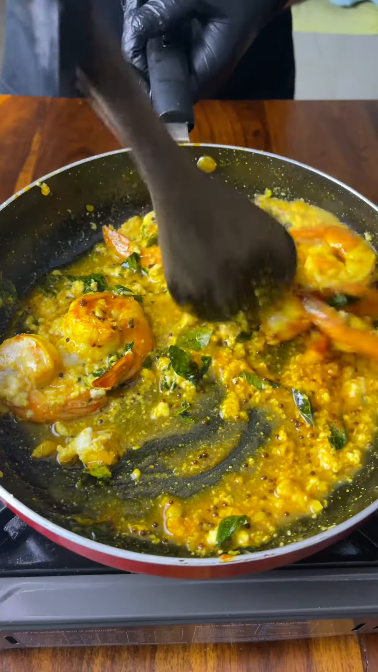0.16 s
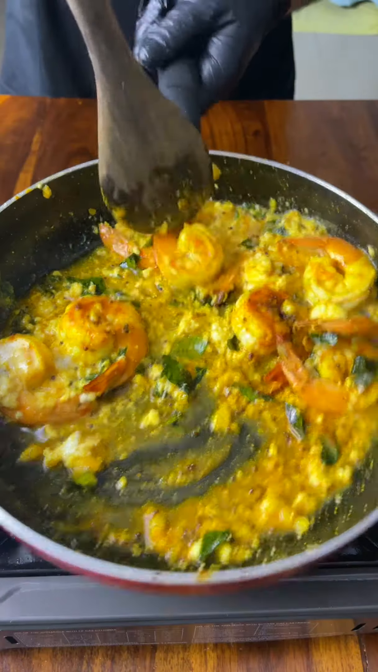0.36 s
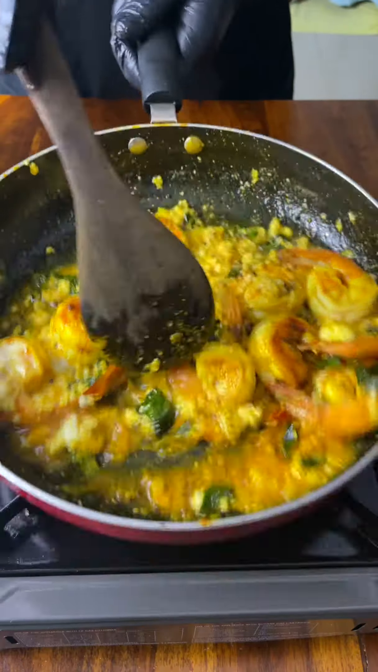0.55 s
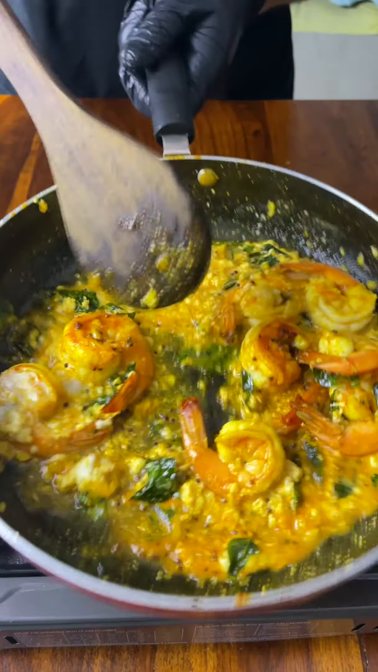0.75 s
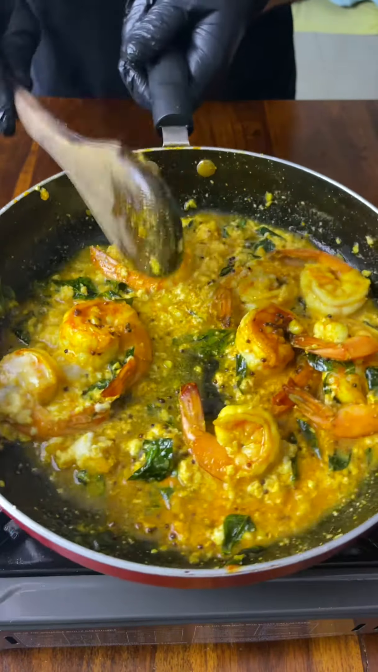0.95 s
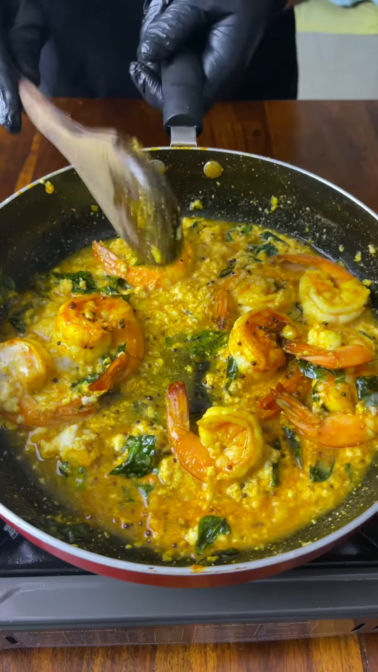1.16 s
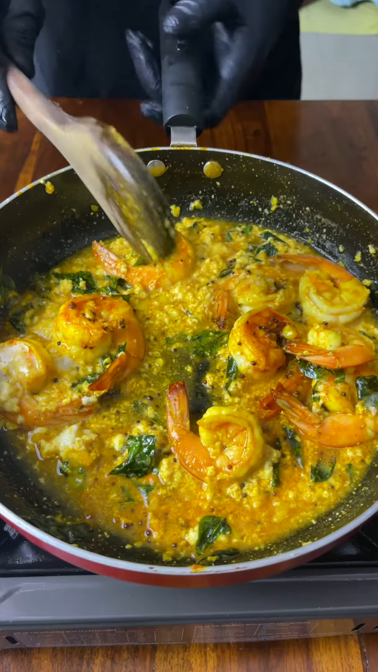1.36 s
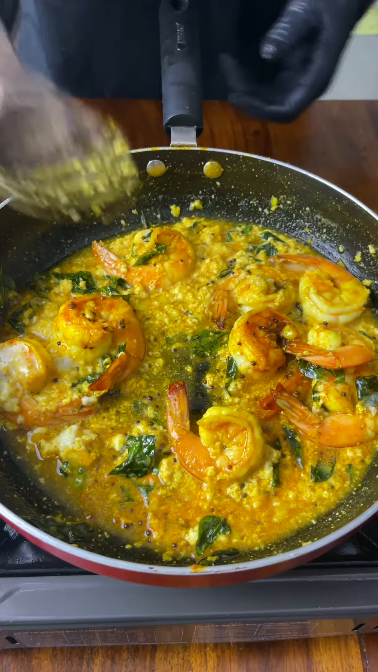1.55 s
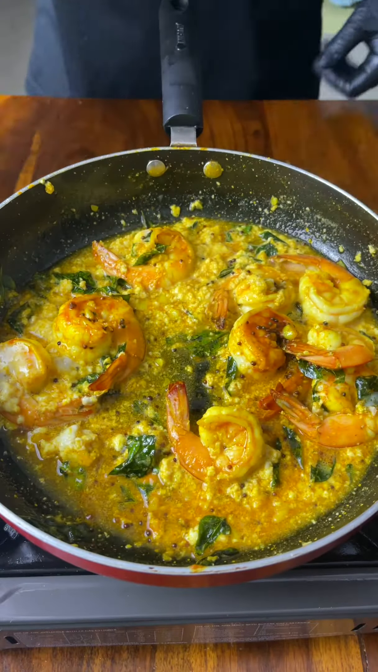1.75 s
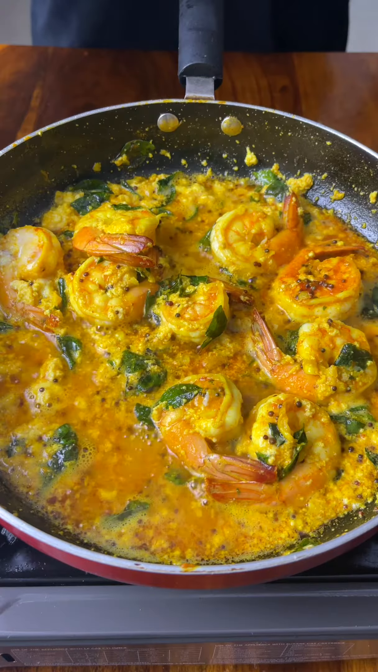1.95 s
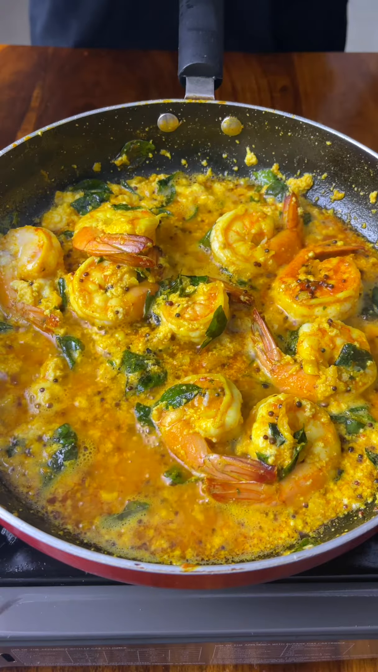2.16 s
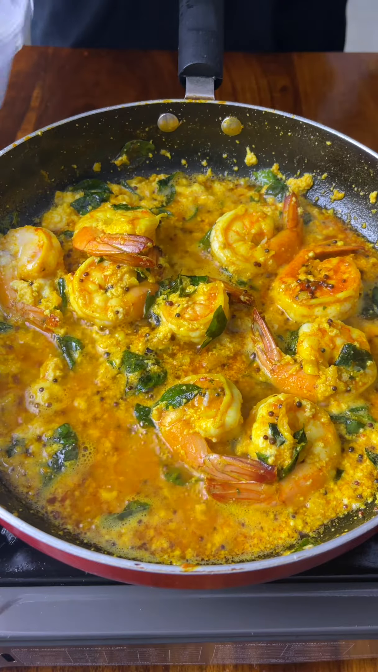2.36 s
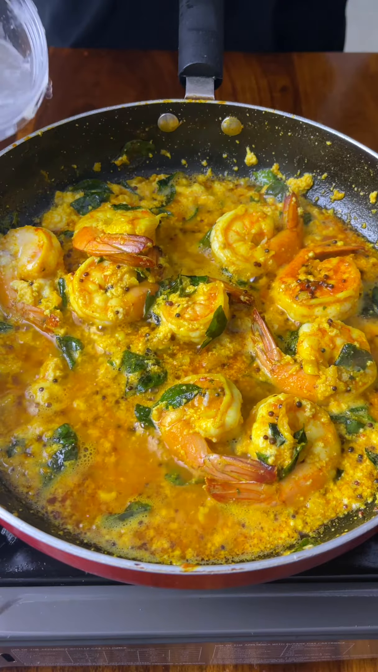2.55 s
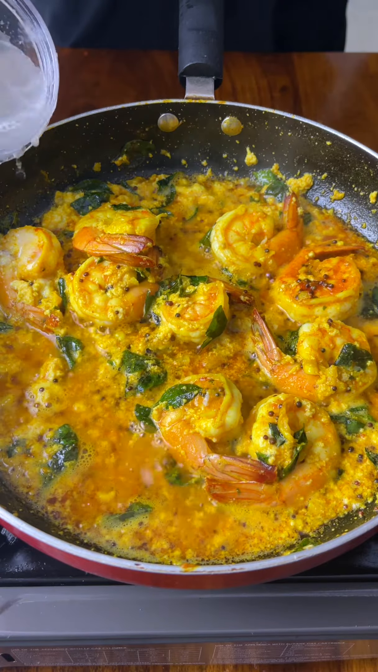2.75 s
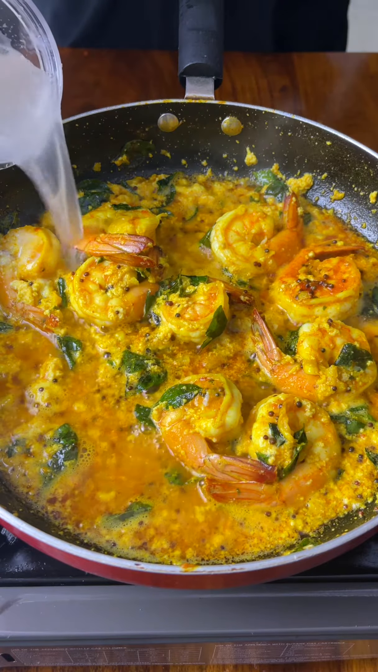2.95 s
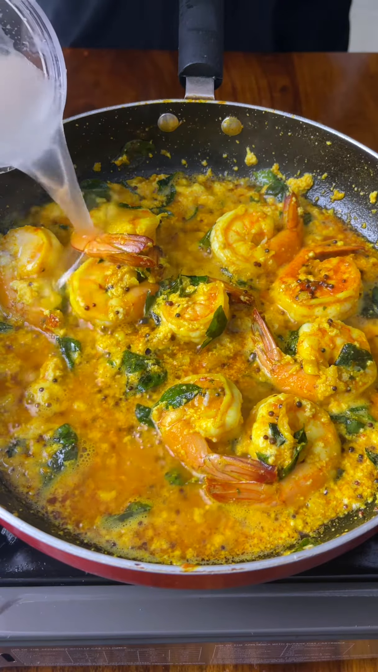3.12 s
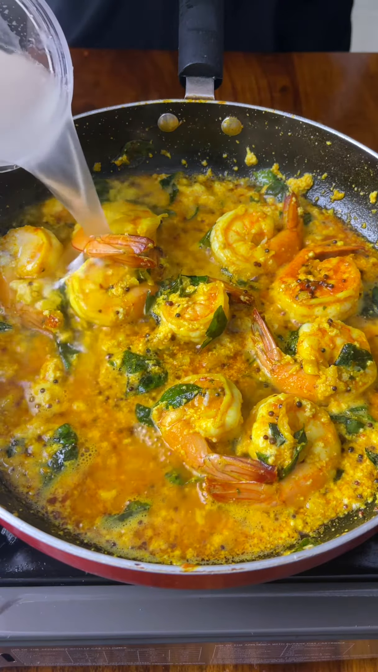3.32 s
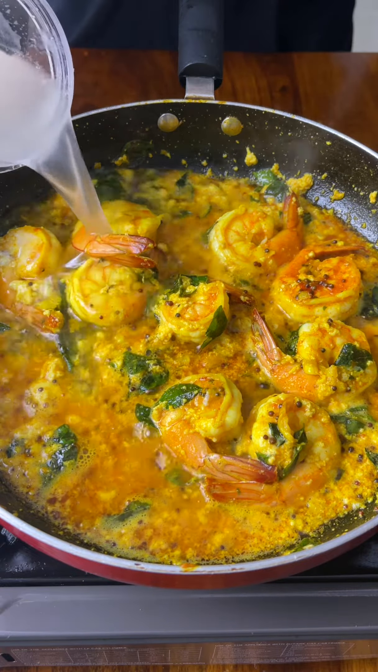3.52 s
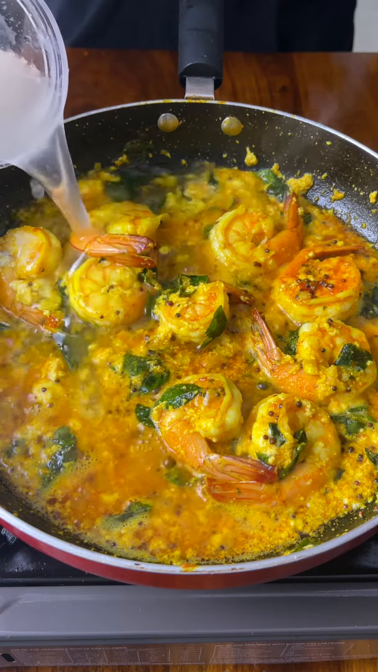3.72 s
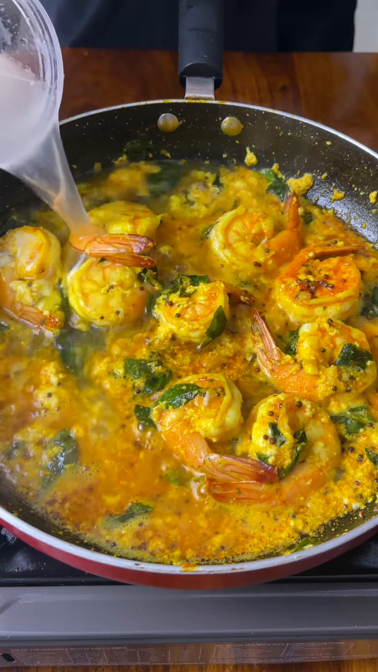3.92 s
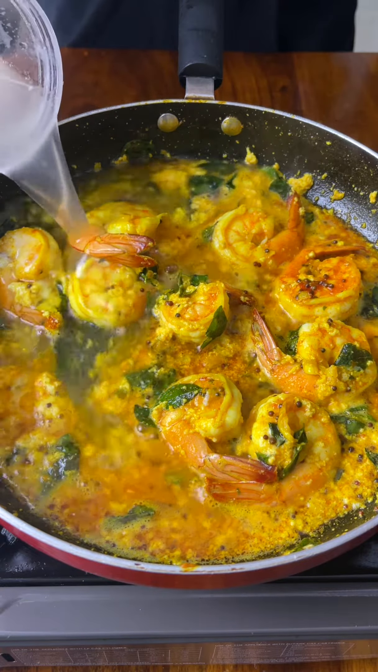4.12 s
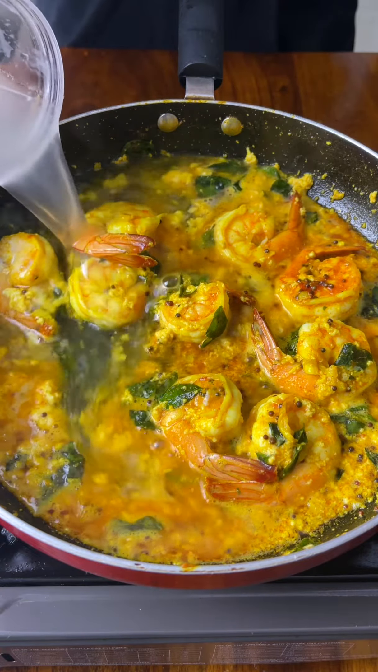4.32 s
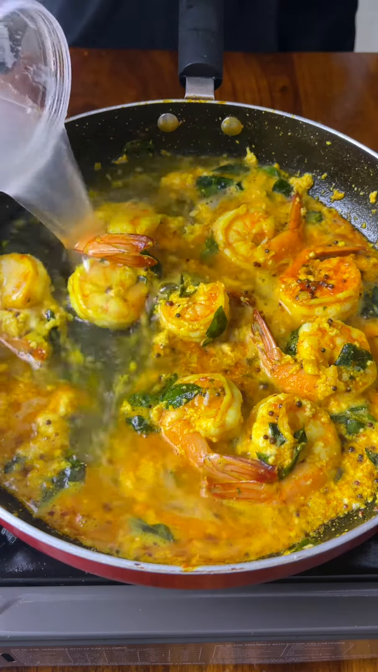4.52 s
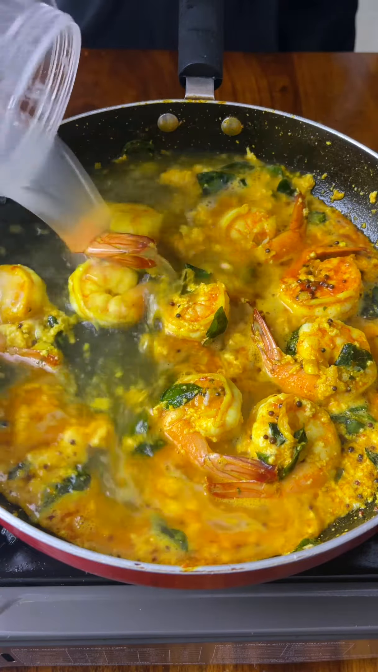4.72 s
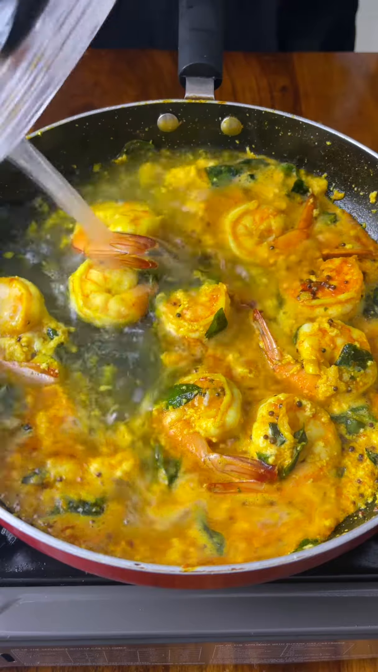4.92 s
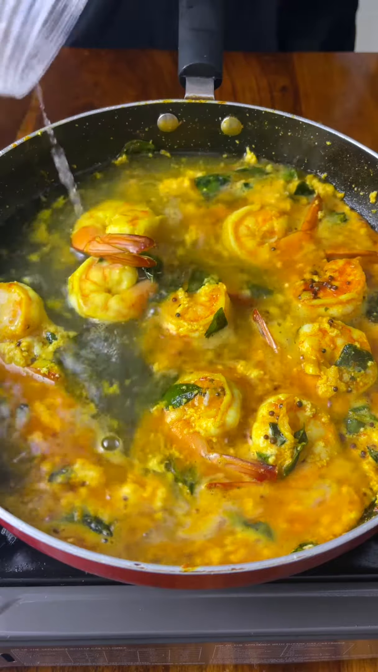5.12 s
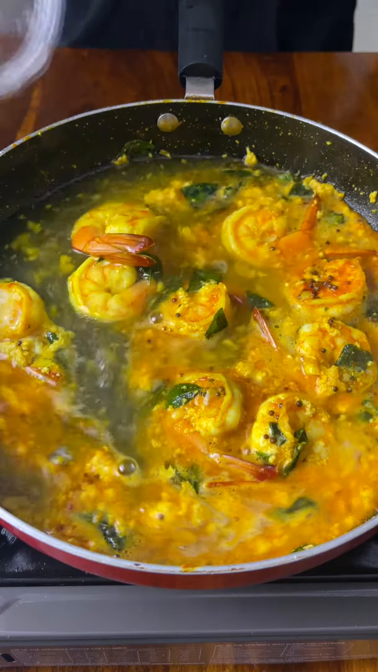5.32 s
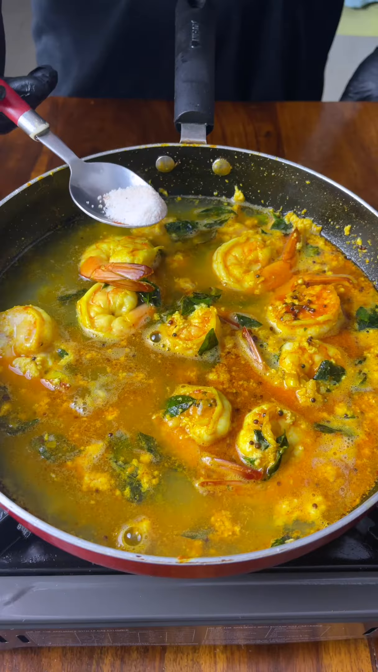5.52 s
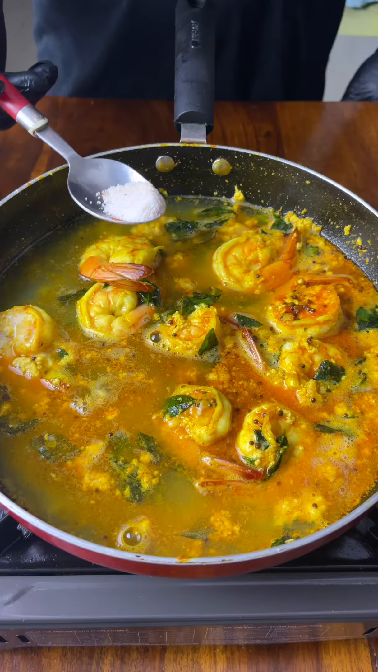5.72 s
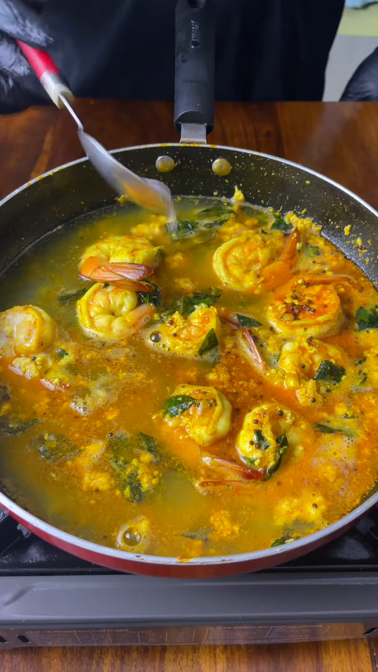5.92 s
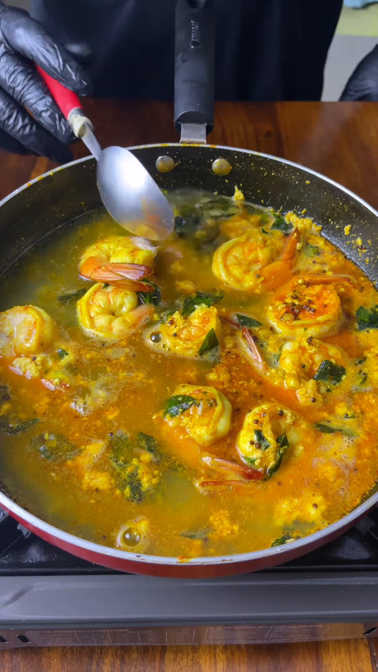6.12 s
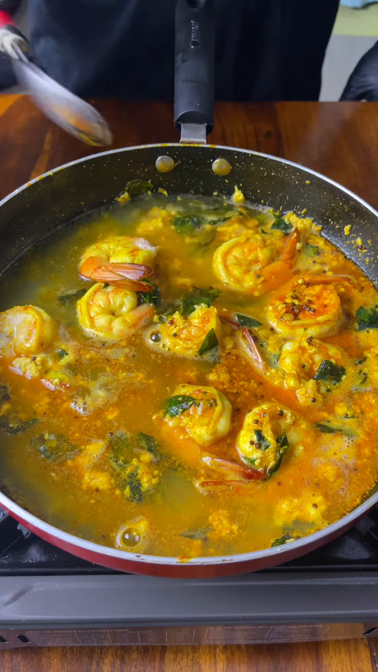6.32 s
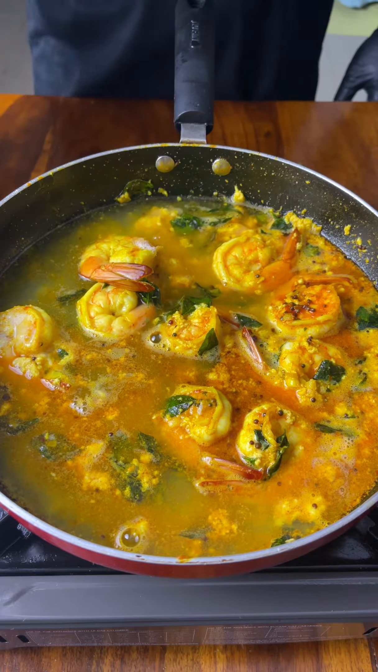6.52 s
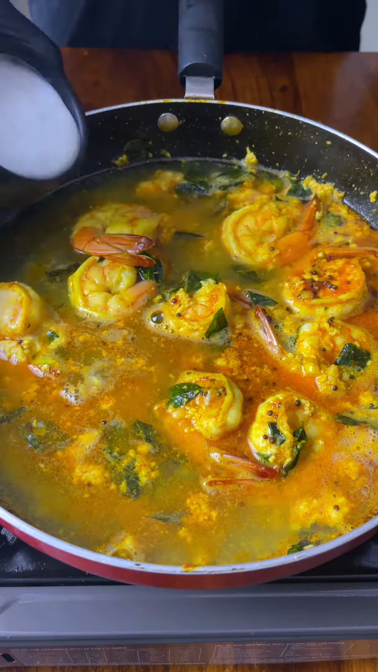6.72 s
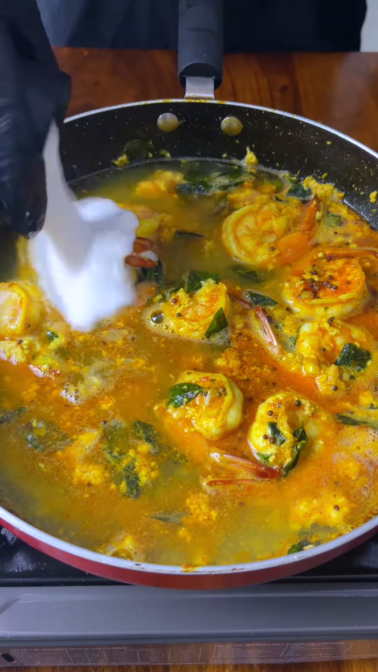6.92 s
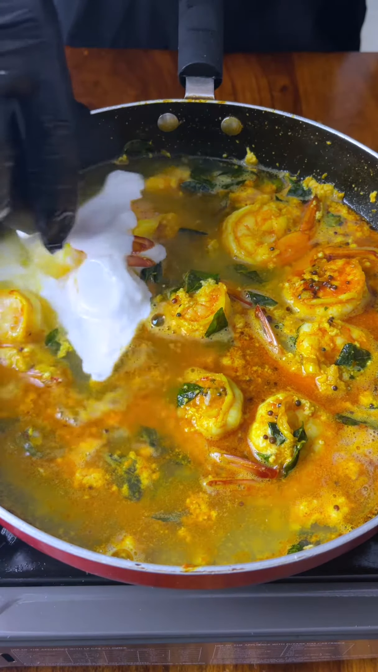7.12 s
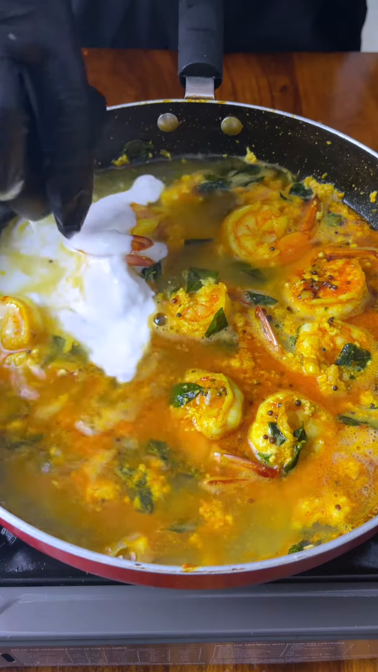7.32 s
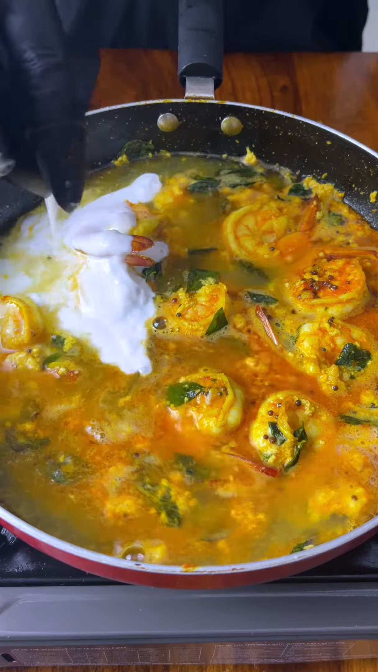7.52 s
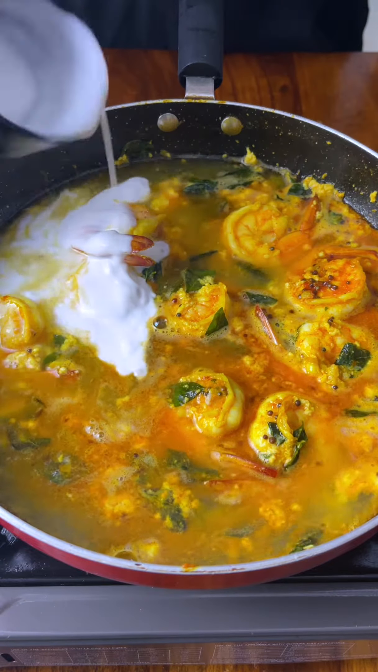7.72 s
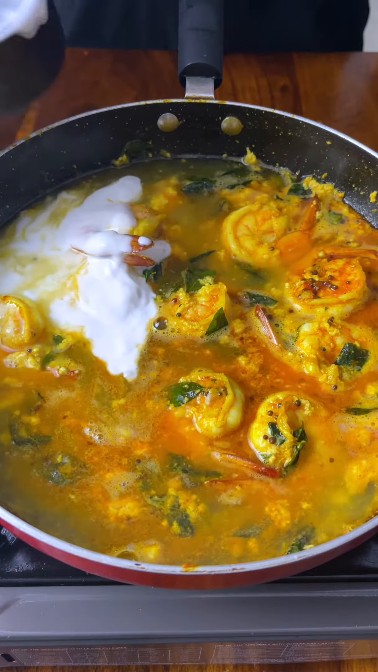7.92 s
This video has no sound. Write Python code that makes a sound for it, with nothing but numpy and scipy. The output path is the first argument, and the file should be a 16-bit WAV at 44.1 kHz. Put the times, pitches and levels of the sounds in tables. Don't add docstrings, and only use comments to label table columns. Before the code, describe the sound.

A quiet kitchen with faint low burner rumble and thin, wavering gas whistle. From 0.3 to 0.9 seconds a wooden spatula scrapes the pan in short, gritty, stick-slip strokes, strongest around 0.55 to 0.65, with woody knocks and crisp wet hiss. At 1.45 it lightly touches, then firmly knocks the rim with a dull ring. At 1.87 the background jumps to a closer, much louder low flame rumble. A jug knocks at 2.7; around 3.0 water slops low, and at 3.15 comes a hard thud. From 3.4 water pours densely: bright bubbles, deeper gulps, fizz and tiny hot-fat spits, fullest until 4.3, then thinning to a trickle ending near 5.07. Burner rumble continues. At 5.98 a spoon hits the counter with a loud, clipped clack; a small drip precedes a bowl's hollow, distorted knock at 7.02. Short room echo follows, then only rumble until 8.

```python
import sys
import numpy as np
from scipy import signal
from scipy.fft import rfft, irfft
from scipy.io import wavfile
from scipy.ndimage import uniform_filter1d, map_coordinates

SR = 44100
rng = np.random.default_rng(int(sys.argv[2]) if len(sys.argv) > 2 else 0)


def field_ratio(decibels):
    return 10 ** (np.asarray(decibels, dtype=float) / 20)


def digitize_waveform(pressure):
    field = np.atleast_2d(pressure).T
    bounded = np.clip(field, -1, 1)
    quanta = np.round(bounded * 32767).astype(np.int16)
    wavfile.write(sys.argv[1], SR, quanta)


N = 355887
TIME = np.arange(N) / SR


def rms_one(x):
    return x / np.sqrt(np.mean(x ** 2) + 1e-20)


def in_time(rows):
    s, *columns = np.transpose(sorted(rows))
    gate = uniform_filter1d(1. * (TIME > s[0]) * (TIME < s[-1]), size=200)
    return [np.interp(TIME, s, c) for c in columns] + [gate]


def swells(rows, swell_db):
    starts = np.transpose(rows)[0]
    current = np.maximum(np.searchsorted(starts, TIME) - 1, 0)
    s, rise, db, fade, extra = np.transpose(rows)[:, current]
    age = TIME - s
    level = db - swell_db * np.clip(1 - age / rise, 0, 1) - fade * np.maximum(age - rise, 0)
    return level, extra, np.maximum(-age, 0)


def at_hz(points, hz):
    points = np.array(points)
    return np.interp(np.log(np.maximum(hz, 1)), np.log(points[:, 0]), points[:, 1])


def colour(x, spectrum):
    size = 8192
    folded = irfft(np.log(field_ratio(at_hz(spectrum, np.fft.rfftfreq(size, 1 / SR)))))
    folded[1:size // 2] *= 2
    folded[size // 2 + 1:] = 0
    kernel = irfft(np.exp(rfft(folded)))
    return signal.oaconvolve(x, kernel / np.sqrt(np.sum(kernel ** 2)))[:len(x)]


def band(x, low_hz, high_hz):
    edges = [low_hz, min(high_hz, .45 * SR)]
    return signal.sosfilt(signal.butter(2, edges, "band", fs=SR, output="sos"), x)


def drift(rate):
    coarse = TIME[::16]
    slow = map_coordinates(rng.standard_normal(4000), [coarse * 2 * rate + 2], order=3)
    return np.interp(TIME, coarse, slow)


def resonate(x, peaks):
    out = 0
    for k, (hz, width, level_db) in enumerate(peaks):
        r = np.exp(-np.pi * width / SR)
        top = [(1 - r * r) / 2, 0, (r * r - 1) / 2]
        bottom = [1, -2 * r * np.cos(2 * np.pi * hz / SR), r * r]
        out = out + (-1) ** k * field_ratio(level_db) * signal.lfilter(top, bottom, x)
    return out


def ring(clicks, hz, t60):
    r, w = field_ratio(-60 / (t60 * SR)), 2 * np.pi * hz / SR
    return signal.lfilter([0, np.sin(w)], [1, -2 * r * np.cos(w), r * r], clicks + 1e-18)


def grit(per_s, spread_db):
    sizes = field_ratio(spread_db * np.minimum(rng.exponential(1, N), 4)) * rng.choice([-1, 1], N)
    return sizes * (rng.random(N) < per_s / SR)


def add(out, s, sound):
    i = round(s * SR)
    out[i:i + len(sound)] += sound[:N - i]


# f/Hz, t60/s
KITCHEN = [(125, 0.49), (500, 0.39), (2000, .34), (5000, 0.31), (10000, 0.18)]


def kitchen(x, lasting=1.0):
    t, tail = TIME[:SR // 2], 0
    for hz in 62.5 * 2. ** np.arange(9):
        octave = band(rng.standard_normal(len(t)), hz / 1.41, hz * 1.41)
        tail = tail + octave * field_ratio(-60 * t / at_hz(KITCHEN, hz) / lasting)
    tail = tail * (t > .004)
    return signal.oaconvolve(x, tail / np.sqrt(np.sum(tail ** 2)))[:N]


# t/s, hiss level/dB, whistle level/dB
FAR_FLOOR = [(0, -60, 6), (1.869, -59, 1)]
NEAR_FLOOR = [(1.869, -45, 3.5), (2.3, -43.5, -0.5), (2.6, -45, 5), (3.0, -42, -7), (5.1, -44, -1),
              (5.5, -47, 3.5), (5.9, -45.5, 1), (6.35, -47, -0.5), (6.6, -47, -3), (6.8, -44, 4),
              (7.0, -45.5, 2), (7.35, -46, 6), (7.7, -45.5, 1), (8.07, -47, -2)]
# f/Hz, level/dB per Hz
FAR_AIR = [(18, -35.5), (30, -1), (197, 2), (769, -9.5), (4800, -19), (5760, -23.5), (7290, -22.5),
           (15600, -25)]
NEAR_AIR = [(12, -36), (20, 8), (64, 3), (428, -15), (1500, -20.5), (3460, -28.5), (4700, -31),
            (15600, -31.5)]
# f/Hz, width/Hz, level/dB
FAR_WHISTLES = [(786, 77, -2), (4110, 200, -6), (5100, 10, -2.5), (5300, 22, -12.5), (5530, 55.3, 0.5),
                (5920, 30, 0), (6660, 80, -5.5), (12700, 43, -5), (14800, 200, -13)]
NEAR_WHISTLES = [(3930, 26, 11), (1100, 50, -10), (1410, 210, -1)]


def background(floor, air, whistles, split_hz, whistle_db, rumble_db, waver_db):
    hiss_db, swell_db, gate = in_time(floor)
    for s, *rest in BLOWS:
        age = np.maximum(TIME - s, 0) / 0.21
        hiss_db = hiss_db + (s > 5.5) * -3.5 * age * np.exp(1 - age)
    low, high = [colour(rng.standard_normal(N), air) for part in "lh"]
    low = signal.sosfilt(signal.butter(1, split_hz, fs=SR, output="sos"), low)
    high = signal.sosfilt(signal.butter(1, split_hz, "high", fs=SR, output="sos"), high)
    whistle = 0
    for peak in whistles:
        whistle = whistle + field_ratio(waver_db * drift(7)) * resonate(rng.standard_normal(N), [peak])
    high = rms_one(high) * field_ratio(0.39 * drift(33)) + field_ratio(whistle_db + swell_db) * rms_one(whistle)
    return gate * field_ratio(hiss_db) * (field_ratio(rumble_db) * rms_one(low) + high)


# t/s, swelling/s, hiss level/dB, fade/dB per s, pitched share/dB
SWEEPS = [(.305, 0.072, -33.5, 500.5, 2), (.427, .003, -39, 499, -7.5), (.447, .012, -26.5, 60, 1.5),
          (.52, .03, -19, 450.5, -4.5), (.587, .004, -17, 152, 0.5), (.607, .012, -12.5, 334.5, -2),
          (.752, .02, -37, 398, -3), (.836, .012, -33, 485.5, 0)]
# f/Hz, width/Hz, level/dB
SWEEP_TONES = [(6700, 200, -6), (10500, 250, 0), (12900, 350, 0), (14900, 350, 0)]
# f/Hz, level/dB per Hz
SWEEP_AIR = [(4000, -13), (6000, -27.5), (9500, -2.5), (12000, 0), (15600, 3.5)]


def swept_sauce():
    hiss_db, pitched_db, ahead = swells(SWEEPS, swell_db=13.5)
    wet = rms_one(grit(per_s=13000, spread_db=-3.5)) * field_ratio(hiss_db) * (ahead == 0)
    return colour(wet, SWEEP_AIR) + field_ratio(1.5) * resonate(wet * field_ratio(pitched_db), SWEEP_TONES)


# t/s, pressing/s, pressure level/dB, fade/dB per s, brightness/dB
PUSHES = [(0.345, 0.017, -8, 306, -6.5), (0.427, 0.11, -7.5, 253, -1), (0.586, 0.0049, -5.5, 207.5, -0.5),
          (.606, 0.0048, -1, 182.5, 1), (0.757, 0.0063, -4, 451, -13), (0.835, 0.0036, -6, 389.5, 1.5),
          (0.909, 0.005, -29.5, 603, -20)]
# t/s, peak level/dB, t60/s
SLIPS = [(0.336, -17, .03), (0.349, 2.5, 0.015), (0.361, -3.5, 0.0085), (0.37, -1, 0.012),
         (0.429, 6, 0.008), (0.457, -1, 0.045), (0.473, -5, 0.035), (0.504, 2.5, 0.015),
         (0.524, 5.5, 0.027), (0.532, -6.5, .02), (0.54, 12, 0.017), (.551, 0.5, 0.015), (0.587, 5, 0.015),
         (0.614, 2, 0.028), (0.622, 14.5, 0.032), (0.635, 1.5, 0.0087), (0.661, -2.5, 0.04),
         (0.677, -7, 0.015), (0.7585, -3, 0.0072), (0.767, -11.5, 0.018), (0.8365, -1.5, 0.0079),
         (.846, 0, 0.016), (0.912, -12, 0.023)]
# f/Hz, level/dB per Hz
SCRAPE = [(60, -11.5), (193, -10.5), (900, -6), (1180, -1.5), (1900, -6), (2250, -14), (3500, -17),
          (9000, -41.5)]
# f/Hz, width/Hz, level/dB
PAN = [(250, 70, -9), (845, 70, -8), (1200, 80, 3), (1830, 50, 0), (2000, 55, -4), (3760, 60, -14),
       (4550, 60, -17), (5570, 50, -18), (6710, 70, -20)]


def spatula():
    pressure_db, bright_db, before = swells(PUSHES, swell_db=6)
    rasp_db = -36.5 + 2.8 * (pressure_db + 13) + bright_db
    lowering_db = 1090 * before + 9 * (before > 0)
    pressure_db, rasp_db = pressure_db - lowering_db, rasp_db - lowering_db
    catches = np.zeros(N)
    for s, db, t60 in SLIPS:
        add(catches, s, field_ratio(db - 17 - 60 * TIME[:3000] / t60))
    contact = rms_one(grit(per_s=6200, spread_db=3.0))
    knocks = np.maximum(np.diff(catches, prepend=0), 0)
    drive = contact * (field_ratio(pressure_db - 9.5) + catches) + field_ratio(11) * knocks
    body = field_ratio(4.5) * colour(drive, SCRAPE) + field_ratio(16) * resonate(drive, PAN)
    body = band(band(body, 65, 25000), 45, 25000)
    rasp = contact * (field_ratio(rasp_db) + field_ratio(-34.0) * catches) + field_ratio(-8.5) * knocks
    rasp = band(rasp, 2100, 6500)
    bite = field_ratio(-21) * band(contact * catches + field_ratio(5.5) * knocks, 5500, 9500)
    dry = body + rasp + swept_sauce() + bite
    return dry + field_ratio(-18) * kitchen(dry)


# t/s, peak level/dB, rise/s, contact t60/s, ring level/dB
BLOWS = [
    (1.441, -19, 0.00044, 0.096, -18),
    (1.454, -3.5, 0.0066, 0.15, -2.5),
    (2.7255, -7, 0.00033, 0.15, -1.5),
    (3.142, 9, 0.00098, 0.05, -9),
    (5.983, 11.5, 0.0068, 0.0518, -19),
    (7.017, 5.5, 0.0067, 0.059, -23.5),
]
# f/Hz, level/dB per Hz
BLOW_COLOURS = [
    [(59, -56), (100, 7), (1430, 8.5), (2280, -15), (15600, -17)],
    [(29, -63), (50, -43), (282, -7.5), (737, -12), (1140, -10.5), (2220, -21), (3770, -20.5), (15600, -49)],
    [(29, -40), (50, 7), (539, 2.5), (872, -11.5), (1880, -7), (2220, -28), (2690, -15.5), (15600, -42)],
    [(29, -19), (50, -11), (350, -10.5), (700, -4.5), (1220, -16), (1670, -18), (2830, -44.5), (15600, -30)],
    [(24, -45), (40, 7.5), (260, 4), (607, -5.5), (1380, 9), (2280, -3), (3480, 3), (15600, -15)],
    [(29, -48.5), (50, -29), (445, -9.5), (737, -24), (1410, -2), (2170, -12), (3510, -7.5), (15600, -43)],
]
# f/Hz, level/dB, t60/s
RIM = [(60.5, -26, 0.18), (259, -4, .3), (273, -10, 0.22), (225, -17, .18), (400, -21, .15),
       (549, -18, .18), (1125, -8, .1), (1530, -18, .1)]
JUG = [(90.5, -8, 0.34), (550, -0.5, 0.057), (1840, -18.5, 0.076), (2550, -16, 0.024)]
JUG_DOWN = [(158.7, -23, 0.35), (279.5, -12.5, 0.18), (553, 7, 0.028), (1064, 1, 0.02), (1640, -4.5, 0.034)]
SPOON = [(91.5, 0.5, 0.14), (241, -0.5, 0.15), (313, -7.5, 0.2), (423, -18.5, 0.42), (620, -21.5, .12),
         (950, -14.5, 0.044), (1290, -1.5, 0.053), (1420, 9, 0.035), (2300, -51.5, 0.045), (2950, 2, 0.045),
         (3370, -2.5, .06), (4160, -0.5, 0.07), (5130, -15.5, .08)]
BOWL = [(88, 0, 0.5), (242.3, -1, 0.2), (630, -11, 0.2), (1141, 1, 0.1), (1394, 6, 0.08), (1560, 7, .07),
        (1800, 5, 0.1), (2008, 0, 0.12), (2400, -10, .2), (2860, -5, 0.24), (3467, -5, .2), (4140, -9, .18),
        (5006, -11, 0.22), (7612, -14, .12)]


def struck_modes(modes, shape, t):
    rings = 0
    for hz, level_db, decay in modes:
        strike = signal.unit_impulse(len(t), 30) + .012 * rng.standard_normal(len(t)) * shape
        damped_s = 0.15 * (hz / 300) ** 0.083
        rings = rings + field_ratio(level_db) * ring(strike, hz, decay) * np.exp(-(t / damped_s) ** 4)
    return rings


def blows():
    dry, t = np.zeros(N), TIME[:SR // 2]
    bodies = [RIM, RIM, JUG, JUG_DOWN, SPOON, BOWL]
    bounce = round(.0095 * SR)
    for (s, db, rise, t60, ring_db), spectrum, modes in zip(BLOWS, BLOW_COLOURS, bodies):
        grow = np.minimum(t / max(rise, 1e-4), 1)
        shape = grow * field_ratio(-60 * np.maximum(t - rise, 0) / t60)
        shape[bounce:] += field_ratio(-12.5) * shape[:-bounce].copy()
        burst = colour(rng.standard_normal(len(t)) * shape, spectrum)
        rattle = rms_one(band(rng.standard_normal(len(t)), 160, 1500))
        burst = burst + field_ratio(-21.5 - 60 * t / 0.29) * grow * rattle
        rings = struck_modes(modes, shape, t)
        add(dry, s, field_ratio(db) * (field_ratio(-10.5) * burst + field_ratio(ring_db) * rings * grow))
    dry = band(dry, 45, 25000)
    first = TIME < FAR_FLOOR[-1][0]
    distant_echo = field_ratio(-17.0) * kitchen(dry * first, lasting=0.92)
    return dry + distant_echo + field_ratio(-16.0) * kitchen(dry * ~first)


def bubbles(events, climb, splash_db, spread, late_s):
    out, t = np.zeros(N), TIME[:2500]
    luck = rng.random((len(events), 9))
    splash = band(rng.standard_normal(N), 2600, 19000)
    for (s, db, hz, cycles), row in zip(events, luck):
        add(out, s, field_ratio(db + splash_db - 60 * t / 0.015) * splash[round(s * SR):][:len(t)])
        family = np.vstack([[0, .5, 0], row.reshape(3, 3)])
        for k, (late, step, weak) in enumerate(family):
            pitch = min(hz * spread ** (step - .5), 15300)
            age = t * pitch / cycles
            shape = 5.4 * age * np.exp(-2.2 * age ** 1.3) / (age + .9)
            level = field_ratio(db - 4.0 - (k > 0) * (7.5 + 2.7 * weak))
            tone = np.sin(2 * np.pi * pitch * t * (1 + climb * age))
            add(out, s - .001 + late_s * late, level * shape * tone)
    return out


# t/s, peak level/dB, f/Hz, cycles
GULPS = [(2.985, -17.5, 1840, 6.4), (3.204, -26, 757, 18), (3.206, -32, 1820, 17),
         (3.1935, -19.5, 5100, 25), (3.455, -11, 714, 6.1), (3.473, -13, 1760, 28),
         (3.515, -13.5, 1666, 15), (3.615, -16.5, 1290, 6.6), (3.639, -8.5, 1640, 2.4),
         (3.679, -24, 1280, 13), (3.784, -20, 1220, 5.8), (3.82, -13, 1870, 15), (3.851, -16.5, 1790, 27),
         (3.899, -14.5, 1930, 6.7), (4.03, -11, 2190, 5.6), (4.34, -14, 1260, 2.6),
         (4.356, -16.5, 604, 4.5), (4.369, -23, 474, 9.3), (4.35, -32, 806, 1.8), (4.385, -24, 1030, 9.7),
         (4.015, -26, 1165, 20), (4.41, -34, 970, 14), (4.465, -24, 1135, 10), (4.57, -31, 950, 23),
         (4.7, -29, 1210, 9.1), (4.79, -40, 900, 9.7), (4.865, -29, 840, 8.6), (4.92, -35, 850, 9.3),
         (4.975, -29, 1310, 14)]
# t/s, peak level/dB, f/Hz, cycles rung
SLOPS = [(3.006, -16, 260, 4.6), (3.0104, -21, 3960, 18), (3.022, 0, 408, 1.95), (3.039, -24.5, 3640, 40),
         (3.095, -7.5, 466, 0.76), (6.907, -14, 1080, 1.1), (7.163, -41, 4300, 8)]
# t/s, peak level/dB, f/Hz
BUBBLES = [(3.2943, -11, 4520), (3.3222, -14, 6100), (3.3651, -34.5, 3750), (3.415, -22.5, 3900),
           (3.441, -22, 3760), (3.4559, -16, 3220), (3.4819, -20.5, 3000), (3.5058, -11.5, 3660),
           (3.5273, -6.5, 4750), (3.5642, -7.5, 5200), (3.6056, -14, 3830), (3.6385, -16, 3870),
           (3.6625, -5, 3620), (3.7188, -31, 4140), (3.7378, -17, 3580), (3.7677, -8, 5500),
           (3.8021, -13, 3570), (3.8391, -6.5, 4920), (3.885, -19.5, 3480), (3.9109, -14.5, 3300),
           (3.9333, -17.5, 2970), (3.9767, -31, 2950), (3.9767, -12, 4120), (4.0286, -10.5, 4980),
           (4.0571, -10.5, 5760), (4.0735, -5, 4330), (4.1474, -15.5, 3280), (4.2067, -14.5, 4240),
           (4.2396, -17, 3330), (4.2736, -13.5, 4110), (4.326, -11.5, 3500), (4.3948, -14.5, 3310),
           (4.4457, -18.5, 4160), (4.4796, -26, 3300), (4.505, -17, 3480), (4.5415, -15, 3860),
           (4.5724, -14, 3350), (4.6188, -24, 3350), (4.6303, -18, 4170), (4.6412, -18.5, 3950),
           (4.6991, -23, 3060), (4.7799, -25, 4020), (4.8363, -18.5, 4010), (4.8692, -23, 3760),
           (4.8827, -14, 4010), (4.9196, -17, 4000), (4.9311, -17.5, 3950), (4.987, -34, 3120),
           (5.0044, -24.5, 6300), (5.0388, -28, 3790), (5.0663, -37, 3360), (5.0842, -36, 3930)]
# t/s, peak level/dB, f/Hz
SPITS = [(3.1783, -29.5, 13000), (3.1926, -26, 13900), (3.2168, -21.5, 11900), (3.2664, -21.5, 13700),
         (3.2935, -29.5, 7950), (3.3581, -19.5, 14300), (3.397, -24, 14300), (3.417, -21.5, 12000),
         (3.4475, -7.5, 10900), (3.4886, -10.5, 14500), (3.5036, -19, 14100), (3.5244, -6.5, 10950),
         (3.5793, -15.5, 14600), (3.5918, -12.5, 14100), (3.604, -14.5, 13200), (3.6223, -10, 12140),
         (3.6737, -16, 14300), (3.7029, -18, 13800), (3.7365, -15, 12300), (3.77, -16.5, 10900),
         (3.838, -25.5, 7800), (3.8717, -10, 12200), (3.9101, -19.5, 7990), (3.967, -38, 10600),
         (4.0232, -16.5, 8770), (4.088, -19.5, 10300), (4.1257, -32, 9100), (4.1401, -24.5, 8800),
         (4.1623, -24, 8830), (4.189, -17.5, 8700), (4.228, -24.5, 8500), (4.272, -6.5, 10200),
         (4.3276, -25, 13100), (4.3856, -25, 8770), (4.412, -23, 8650), (4.4679, -21.5, 11500),
         (4.4973, -31, 14200), (4.5727, -22, 8850), (4.637, -26, 13000), (4.6554, -10, 13700),
         (4.739, -35.5, 8500), (4.8009, -23, 14100), (4.9947, -31, 10800), (5.1074, -31, 12500),
         (5.4362, -25, 15100)]


def ringing_bubbles():
    clear = [(*row, 22.3) for row in BUBBLES]
    spits = [(*row, 38) for row in SPITS]
    dry = bubbles(GULPS, climb=0.027, splash_db=-32.5, spread=1.554, late_s=0.01)
    dry += bubbles(SLOPS, climb=0.0081, splash_db=-26, spread=1.5, late_s=0.00214)
    dry += bubbles(clear, climb=0.01, splash_db=-17.0, spread=1.866, late_s=.003)
    dry += bubbles(spits, climb=0.005, splash_db=-11.5, spread=1.5, late_s=.004)
    return dry


# f/Hz, level/dB
FIZZ = [(500, -9), (1290, -7), (1750, -1.5), (2810, -11.5), (3640, -5.5), (7260, -13), (10300, -5.5),
        (15600, -1)]


def fizz(clumps, low_hz, high_hz, per_s, cycles):
    born = grit(per_s * clumps, spread_db=5.5)
    dealt = rng.integers(0, 14, N)
    swarm = 0
    for k, hz in enumerate(np.geomspace(low_hz, high_hz, 14)):
        bubble = ring(ring(born * (dealt == k), hz, cycles / hz), hz * 1.02, cycles / hz)
        swarm = swarm + field_ratio(at_hz(FIZZ, hz)) * hz ** 1.6 * bubble
    return rms_one(swarm)


# f/Hz, width/Hz, level/dB
FIZZ_TONES = [(3210, 290, -7), (3950, 650, 5)]


def small_bubbles(clumps):
    small = fizz(clumps, 2300, 6800, per_s=1900, cycles=45)
    small = rms_one(small + resonate(small, FIZZ_TONES))
    steam = rms_one(band(rng.standard_normal(N), 1000, 5800)) * clumps ** 0.64
    return small + field_ratio(-6.0) * steam


# f/Hz, width/Hz, level/dB
SPRAY_TONES = [(8450, 260, -0.5), (10200, 120, 5), (11200, 700, -16), (13200, 300, 5.5)]


def fine_spray(clumps):
    spray = fizz(clumps, 7200, 15500, per_s=1600, cycles=50)
    spray = spray + field_ratio(-5.5) * rms_one(band(rng.standard_normal(N), 6500, 19000)) * clumps
    return rms_one(spray + field_ratio(3.5) * resonate(spray, SPRAY_TONES))


# t/s, f/Hz, level/dB
HOLLOW = [(3.7, 1400, -52), (4.05, 1170, -47), (4.45, 1010, -43), (4.8, 900, -44), (5.05, 830, -48)]


def jug_air():
    hollow_hz, hollow_db, gate = in_time(HOLLOW)
    tone = np.sin(2 * np.pi * np.cumsum(hollow_hz) / SR)
    return gate * field_ratio(hollow_db) * drift(55) * field_ratio(3 * drift(6) - 4) * tone


# t/s, swelling/s, fizz level/dB, fade/dB per s, gurgle over fizz/dB
SURGES = [(2.98, 0.063, -33.5, 277, 9), (3.17, 0.19, -57.5, 28, 6), (3.408, .01, -30.5, 50, -14),
          (3.44, 0.022, -24, 60.5, 5), (3.545, 0.018, -33.5, 200, -14), (3.6, 0.045, -19.5, 403, 0.5),
          (3.735, 0.086, -21, 71.5, 0), (4.012, 0.01, -20.5, 42, -7.5), (4.235, 0.178, -22, 92, -5),
          (4.49, 0.052, -25.5, 21, -7.5), (4.66, 0.079, -29, 59, 2), (4.82, 0.028, -34, 31, 4.5),
          (4.97, .03, -32.5, 29.5, 1)]


def pouring():
    ends_s = 5.068
    clumps = field_ratio(5.0 * drift(45))
    small = small_bubbles(clumps)
    spray = fine_spray(clumps)
    gurgle = fizz(clumps, 650, 2200, per_s=500, cycles=40)
    fizz_db, over_db, before = swells(SURGES, swell_db=2.5)
    gurgle_db = swells(SURGES, swell_db=8)[0] + over_db
    gurgle_db = np.maximum(gurgle_db, -61)
    cooling_db = 5 * np.maximum(TIME - 3.51, 0)
    spray_db = -28.5 + 0.84 * (fizz_db + 26.5) - cooling_db
    gate = uniform_filter1d(1. * (before == 0) * (TIME < ends_s), size=200)
    stream = field_ratio(fizz_db - 8.0) * small + field_ratio(spray_db - 4.5) * spray + field_ratio(gurgle_db - 12.5) * gurgle
    dry = ringing_bubbles() + gate * stream + jug_air()
    echo = np.concatenate([np.zeros(round(0.0037 * SR)), dry])[:N]
    room = kitchen(dry) * np.where(TIME < ends_s, 1, .3)
    return dry + field_ratio(-25.0) * echo + field_ratio(-12.0) * room


def scene():
    far = background(FAR_FLOOR, FAR_AIR, FAR_WHISTLES, split_hz=660, whistle_db=-2, rumble_db=-1.0, waver_db=4.5)
    near = background(NEAR_FLOOR, NEAR_AIR, NEAR_WHISTLES,
                      split_hz=700, whistle_db=-9, rumble_db=10.0, waver_db=2.0)
    return (far + near + spatula() + blows() + pouring())[None]


def band_limit(x):
    return signal.sosfilt(signal.butter(12, 15710, fs=SR, output="sos"), x)


def record(dry):
    heard = signal.sosfilt(signal.butter(4, 38, "high", fs=SR, output="sos"), dry)
    mix = np.clip(heard, -.98, .98)
    return band_limit(mix)


dry = scene()
out = record(dry)
digitize_waveform(out)
```